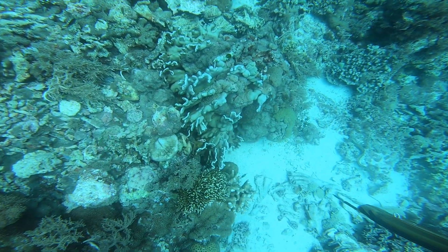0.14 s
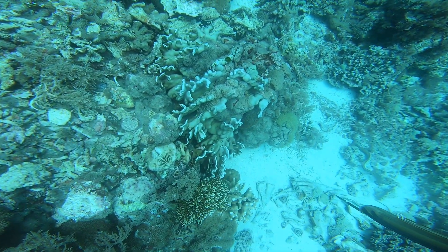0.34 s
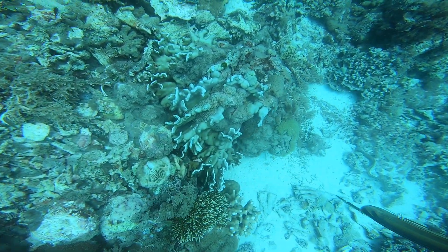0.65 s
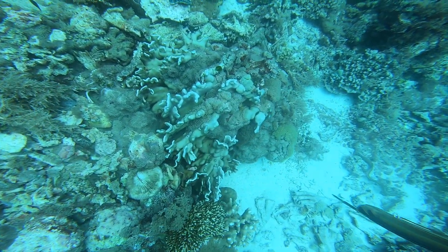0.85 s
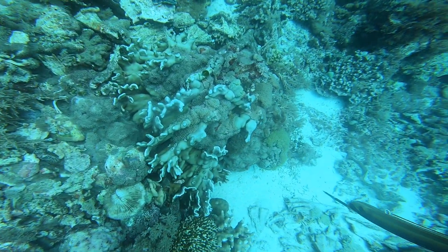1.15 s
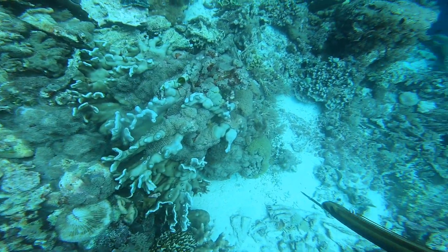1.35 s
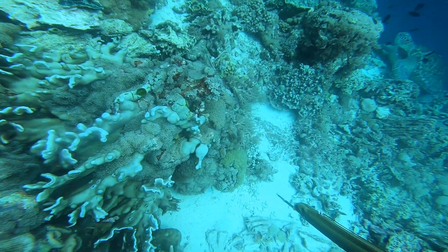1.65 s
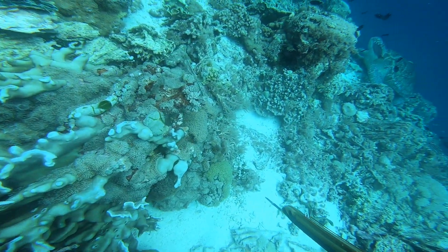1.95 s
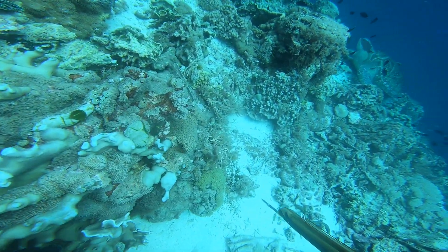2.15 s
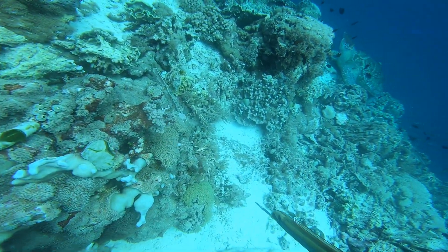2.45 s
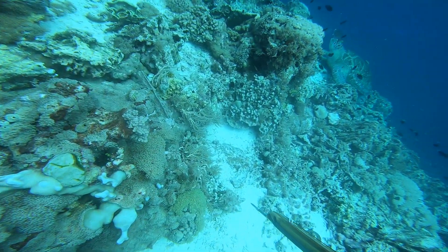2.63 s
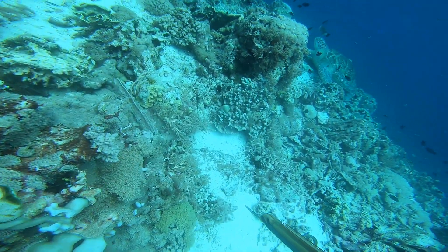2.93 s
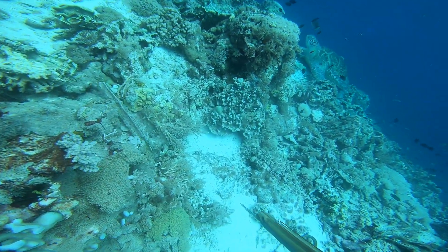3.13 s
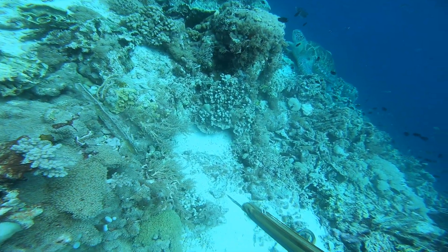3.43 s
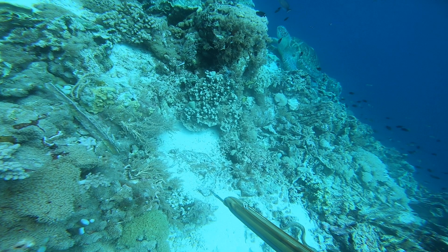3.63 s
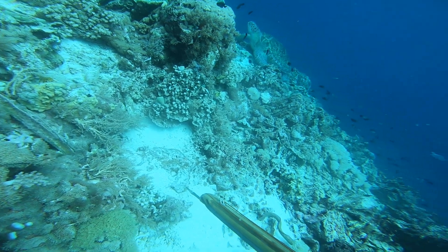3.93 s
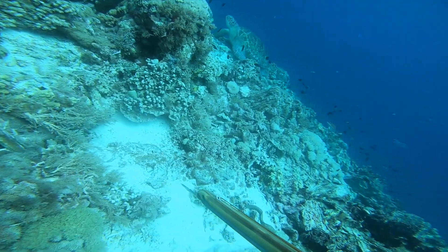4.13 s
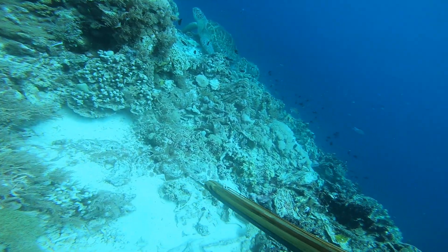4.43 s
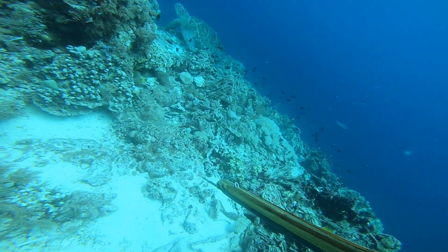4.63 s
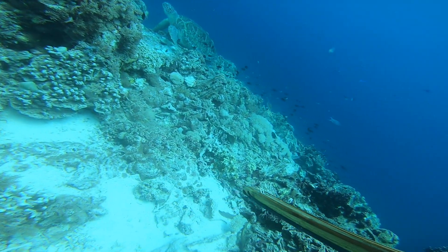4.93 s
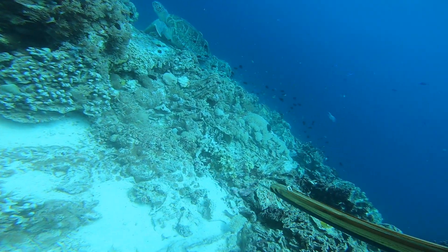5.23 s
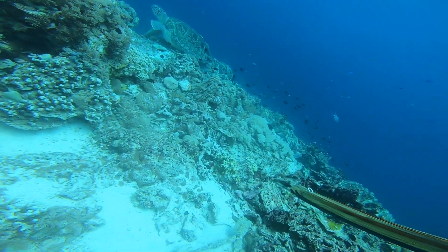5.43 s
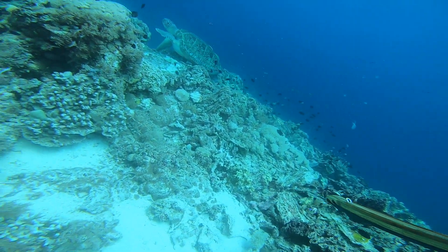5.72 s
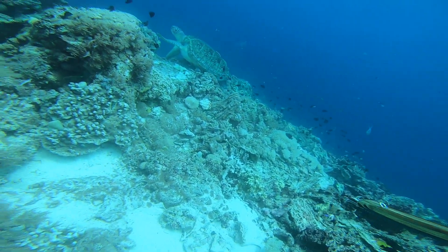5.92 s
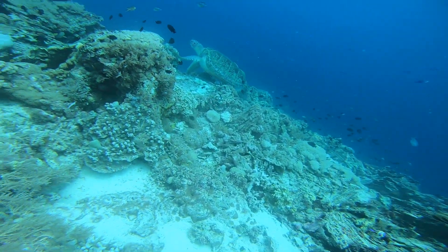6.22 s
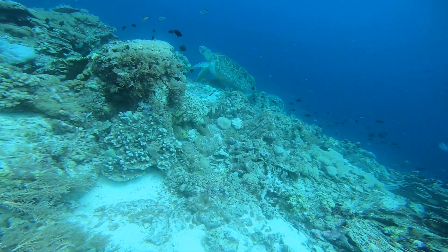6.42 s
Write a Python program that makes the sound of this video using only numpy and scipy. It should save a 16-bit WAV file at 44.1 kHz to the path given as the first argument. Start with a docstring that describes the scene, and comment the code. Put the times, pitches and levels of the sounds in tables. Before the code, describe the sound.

Many small sharp clicks and crackles fill a coral reef underwater, while water rumbles past and occasional low knocks and pops sound.

```python
"""A coral reef, heard from a watertight camera housing that glides over it.
Snapping shrimp crackle all around, each snap an impulse that excites the housing's normal modes.
Among them come dull pops and low knocks, both damped oscillations, and a few bubbles rising in pitch.
Turbulent water rumbles past the housing. The stereo image is a point at first, then opens wide."""
import sys
import numpy as np
from scipy import signal
from scipy.fft import rfft, irfft, next_fast_len
from scipy.io import wavfile

SR = 44100
rng = np.random.default_rng(int(sys.argv[2]) if len(sys.argv) > 2 else 0)


def file_out(sig):
    """Save sig as 16-bit WAV at sys.argv[1]."""
    # one column per channel
    cols = np.atleast_2d(sig).T
    # limit, then scale
    lim = np.clip(cols, -1, 1)
    pcm = np.round(lim * 32767).astype(np.int16)
    wavfile.write(sys.argv[1], SR, pcm)


N = 289737

# All levels are relative.
# loudest snaps of near shrimp: t/s, level/dB, tilt/(dB per octave), presence near 3.7 kHz/dB
NEAR_SNAPS = [(0.0102, -27, -2.5, -2.5), (0.0165, -31, -7, -4), (0.0295, -40, 7.5, -4.5),
              (0.083, -34.5, -9, 7), (0.2024, -31, -5, -3), (0.2136, -32.5, -0.5, 6), (0.329, -38.5, 0, 0),
              (0.3526, -35, -9.5, 12), (0.4989, -25.5, -1.5, -1), (0.1984, -35.5, -10, 6),
              (0.408, -34, -13, -3), (0.587, -49.5, 11.5, -8), (0.6082, -46.5, -10, 23),
              (0.664, -36.5, -3.5, 2), (0.783, -35.5, -3.5, 3), (0.991, -33, 3, 1), (0.9943, -24, -6, -2.5),
              (1.0251, -23, -5.5, -6), (1.0305, -23, -5, -13), (1.0837, -32.5, -5.5, 4),
              (1.2006, -39.5, 10.5, -4), (1.2451, -32, -6, -11), (1.2481, -18.5, -8.5, -4),
              (1.3297, -41.5, -11.5, 23.5), (1.3717, -35, 2.5, -6), (1.5184, -32.5, 5.5, -9.5),
              (1.572, -33, -1.5, -12), (1.7463, -41.5, 2, 2.5), (1.756, -35, -3, -2),
              (1.8656, -35, 1.5, -0.5), (1.8911, -20, -3.5, -17), (1.8953, -18, -6.5, -21),
              (2.087, -33, 6.5, -6.5), (2.1685, -45, 3, 5), (2.296, -45, 1.5, 2), (2.5253, -46, 5, -2),
              (2.6365, -42.5, 1, -2), (2.7402, -35.5, 8.5, -4.5), (3.095, -30, -4.5, -14),
              (3.1044, -52, 5.5, -14), (3.2403, -45, 5.5, -1), (3.3162, -40, -0.5, -10),
              (3.4313, -49, 1, -7), (3.462, -38, -6, 2), (3.5236, -43.5, 0, 3), (3.477, -31, -10, 15),
              (3.4868, -42.5, 5.5, 4), (3.8758, -41.5, -9, 10), (3.9089, -35, -15, -10),
              (4.0614, -39, -15, -17), (4.0667, -41, -9, -14), (4.1188, -43, 5, -7),
              (4.1992, -40.5, 2.5, -0.5), (4.248, -38.5, 0.5, 3), (4.3502, -39, -12, 2.5),
              (4.425, -43, 1, -5), (4.4436, -42.5, 7, -6.5), (4.543, -47.5, 6, 5),
              (4.6608, -43.5, 5.5, 2.5), (4.715, -36, -0.5, -0.5), (4.7839, -46.5, 10.5, -13),
              (4.874, -45, -6, 10), (4.8798, -37, -4, 11.5), (5.011, -38, -3.5, -6),
              (5.0441, -44.5, 2, 2.5), (5.2454, -30.5, -11, 6), (5.2557, -32, -2, 8), (5.4707, -47, 7.5, 2),
              (5.627, -23.5, -3.5, -6.5), (5.6661, -38, -4.5, 3), (5.7947, -40.5, 2, 13.5),
              (5.8065, -42.5, 0.5, 15.5), (5.8633, -41.5, -0.5, 9), (5.8731, -38.5, -0.2, 4.5),
              (6.2435, -52, 9.5, -12), (6.2798, -40, -3, -2), (6.3515, -40, 3, -6),
              (6.4528, -36.5, 1.8, -14), (6.4735, -33.5, -1.5, 12.5), (6.483, -38, -0.5, 2)]
# normal modes of the housing: f/Hz, bandwidth/Hz, level/dB
HOUSING_MODES = [(1310, 65, -9.5), (1782, 258, -5.5), (2200, 261, 3), (2555, 276, -1.5), (3233, 220, -4),
                 (4040, 526, -8.5), (4940, 590, -4), (6210, 630, -12), (7180, 320, -16.5), (8790, 760, -17),
                 (10060, 3200, -27.5)]
# the colony's crackle, which falls as the dense coral is left behind: t/s, level/dB
COLONY_LEVEL = [(0, -50.5), (0.86, -52), (1.25, -49.5), (1.74, -54), (2.05, -54.5), (2.8, -61),
                (3.45, -56.5), (3.8, -60.5), (4.48, -56.5), (4.85, -58.5), (5.6, -57), (6.05, -58.5),
                (6.28, -57.5), (6.57, -57)]
# loudest dull pops, perhaps fish biting at the coral: t/s, level/dB
NEAR_POPS = [(0.2057, -40.5), (0.2693, -40.5), (0.4898, -40), (0.737, -44.5), (0.9343, -36), (0.964, -38),
             (0.992, -35), (1.1745, -40.5), (1.4264, -43), (1.7068, -43.5), (1.755, -36.5), (1.8175, -43.5),
             (2.417, -50.5), (2.6214, -44.5), (3.214, -42), (3.226, -44), (3.241, -39), (3.2566, -41.5),
             (3.4301, -41), (3.5616, -41), (3.6212, -46.5), (3.81, -52), (4.0608, -53), (4.219, -45.5),
             (5.7007, -42.5), (5.8814, -42), (5.983, -42), (6.1747, -43)]
# loudest low knocks, perhaps of the housing's mount: t/s, level/dB, f/Hz, thud re knock/dB
LOUD_KNOCKS = [(0.2157, -47.5, 362, -3), (0.3008, -45, 325, -12), (0.4582, -36.5, 390, -4.5),
               (1.1321, -33.5, 396, -13), (1.7622, -27.5, 371, -15), (2.2346, -42, 394, -1.5),
               (2.5165, -43, 358, 2.5), (2.8192, -46, 367, -7), (2.8758, -38, 415, -13.1),
               (3.1768, -45, 440, 1.5), (3.8756, -49, 412, 3), (4.0978, -48, 360, 3),
               (4.1713, -47.5, 430, -1), (4.3458, -47.5, 489, 2), (4.4075, -40.5, 386, -8),
               (4.4848, -40.5, 416, -19), (4.6932, -43.5, 397, -21), (4.783, -38, 402, -25),
               (5.4811, -39, 423, -2), (5.5357, -41.5, 424, 5), (5.5935, -41.5, 465, 3),
               (5.669, -43, 450, -21), (5.7139, -42, 437, 1), (6.118, -47.5, 434, -1)]
# bubbles: t/s, level/dB, starting f/Hz, rise/octaves, duration/s
BUBBLE_NOTES = [(1.743, -37, 167, 0.86, 0.03), (1.755, -43.5, 610, 0.09, 0.021),
                (1.772, -43.5, 400, 0.11, 0.019), (2.539, -54.5, 597, .1, 0.017),
                (3.567, -44.5, 2096, 0.045, 0.029), (4.071, -54, 680, .1, 0.013)]
# surges of water: crest t/s, swell/dB, duration/s
WATER_SURGES = [(0.483, 3.5, 0.15), (0.8, 5.5, 0.076), (1.422, 6, 0.15), (2.33, 7.5, 0.049),
                (2.53, 12, .16), (2.693, 17, 0.035), (2.893, 3.5, .1), (3.224, 8, 0.083), (3.623, 7, 0.053),
                (3.885, 6.5, 0.054), (4.045, 5, 0.085), (5.12, 6, 0.073), (5.3, 7.5, 0.25), (5.55, 7.5, .2),
                (6.065, 8.5, 0.15)]
# spectral density of the flow's rumble: f/Hz, level/dB
RUMBLE_SPECTRUM = [(12, -4.5), (25, 0.5), (42, -4), (65, -10), (100, -18.5), (160, -33), (300, -83)]
# spectral density of the flow's wash: f/Hz, level/dB
WASH_SPECTRUM = [(60, -27), (110, -5), (155, 3.5), (220, -4.5), (295, -10), (390, -4.5), (480, -8.5),
                 (650, -19.5), (1000, -20.5), (1600, -20), (3000, -62)]
# stereo width: t/s, width (0 to 1)
STEREO_WIDTH = [(1.8, 0), (1.92, 0.22), (2.4, 0.68), (4.2, 0.83), (4.4, 0.3), (4.65, 0.15), (5.1, 0.62)]
# side channel re mid at full width: f/Hz, level/dB
SIDE_LEVEL = [(60, -2), (170, -4), (280, -14), (420, 7), (800, 13.5), (1300, 10.5), (2200, 5.5), (3200, 1),
              (4200, -0.5), (5200, 2), (9000, 1.5), (15000, 3.5)]
# phase lead of side over mid: f/Hz, phase/rad
SIDE_LEAD = [(90, 0), (170, 1.7), (280, 3.0), (420, 2.8), (800, 1.8), (1300, 1.65), (3200, 1.65),
             (4200, 1.9), (5200, 3.1)]


def near_shrimp(gain_db, tilt_db, presence_db):
    """Impulse excitation: a claw snap, or its echo off the surface, strikes the housing as one click."""
    times, levels, tilts, presences = np.transpose(NEAR_SNAPS)
    return housing(times, levels + gain_db, tilts + tilt_db, presences + presence_db, scatter_db=3.5)


def housing(times, level_db, tilt_db, presence_db, scatter_db):
    """Modal superposition: each click drives every resonance with its own colour and a random weight."""
    onsets = np.clip(np.round(times * SR).astype(int), 0, N - 1)
    chance_db = scatter_db * rng.standard_normal((len(onsets), len(HOUSING_MODES)))
    out = np.zeros(N)
    for k, (hz, bandwidth, mode_db) in enumerate(HOUSING_MODES):
        presence_band = np.exp(-(np.log2(hz / 3750) / 0.55) ** 2)
        colour_db = tilt_db * np.log2(max(hz, 1800) / 2200) + presence_db * presence_band
        clicks = np.bincount(onsets, from_db(level_db + mode_db + colour_db + chance_db[:, k]), N)
        radius = np.exp(-np.pi * bandwidth / SR)
        feedforward = np.array([1, 0, -1]) * (1 - radius ** 2) / 2
        feedback = [1, -2 * radius * np.cos(2 * np.pi * hz / SR), radius ** 2]
        out += (-1) ** k * signal.lfilter(feedforward, feedback, clicks + 1e-18)
    return wall(out)


def wall(x):
    """Multipath transmission: the wall passes one band, by paths a fraction of a millisecond apart."""
    x = signal.sosfilt(signal.butter(2, [1150, 11000], "band", fs=SR, output="sos"), x)
    for delay_s in (0.00011, 0.00027):
        feedback = np.r_[1, np.zeros(int(delay_s * SR)), -0.5]
        x = signal.lfilter(feedback[::-1], feedback, x + 1e-18)   # allpass
    return x


def colony(ticks_db, fizz_db, strays_db, treble_db):
    """Incoherent summation: ticks and stray snaps over a distant fizz, whose top swings less in level."""
    ticks = from_db(ticks_db) * far_shrimp(per_s=260, spread_db=7.0, tilt_db=1.0, tilt_spread_db=6.0)
    fizz = from_db(fizz_db) * far_shrimp(per_s=2500, spread_db=-1.0, tilt_db=0.6, tilt_spread_db=9.5)
    strays = from_db(strays_db) * far_shrimp(per_s=18, spread_db=-0.9, tilt_db=2.5, tilt_spread_db=10.0)
    level_db = in_time(COLONY_LEVEL)
    crackle = from_db(level_db) * (ticks + fizz)
    # the top, above 7 kHz, carries farther and follows only a share of the swing
    top = shaped(crackle, lambda hz: 1 / (1 + (7000 / (hz + 1)) ** 8))
    top_db = -65.5 + treble_db + 0.68 * (level_db - level_db.mean())
    return strays + crackle + top * (from_db(top_db - level_db) - 1)


def far_shrimp(per_s, spread_db, tilt_db, tilt_spread_db):
    """Shot noise: snaps from random times and distances ring the housing; rms one."""
    when, reach, brightness, presence = rng.random((int(per_s * N / SR), 4)).T
    tilts = tilt_db + tilt_spread_db * (2 * brightness - 1)
    distance_db = spread_db * np.minimum(-np.log(1 - reach), 2.6)   # capped exponential distribution
    level_db = distance_db - 0.6 * tilts   # the tilt pivots in mid-treble, so bright snaps are no louder
    return rms_one(housing(when * N / SR, level_db, tilts, 8.3 * (2 * presence - 1), scatter_db=4.5))


def pops(nominal_hz, low_db, t60, lag_s, grit_db):
    """Heavy damping: a pop is a few gritty cycles of three broad resonances, the lower ones later."""
    near = [(s, level_db, nominal_hz) for s, level_db in NEAR_POPS]
    faint = random_events(per_s=20, ranges=[(-68, -68 + 12.5), (1220, 1620)])   # level/dB, nominal f/Hz
    events = np.vstack([near, faint])
    detune = 2 ** rng.uniform(-0.16, 0.31, (len(events), 3))
    out = np.zeros(N)
    for (s, level_db, hz), (high, middle, low) in zip(events, detune):
        add(out, s - lag_s, from_db(level_db) * ping(hz * high * 1.118, t60, rise_s=0.00088))
        add(out, s, from_db(level_db + low_db) * ping(hz * middle * 0.78, t60, rise_s=0.00092))
        add(out, s + lag_s, from_db(level_db + low_db - 18) * ping(hz * low * 0.527, t60, rise_s=0.0054))
    return out * (1 + from_db(grit_db) * drift(680))


def knocks(gain_db, thud_gain_db, overtone_db, t60, grit_db):
    """Free vibration: a soft contact rings one low mode and a weak overtone above a duller thud."""
    # level/dB, f/Hz, thud re knock/dB
    faint = random_events(per_s=3, ranges=[(-62, -62 + 9.5), (344, 480), (-8.5, -8.5 + 9.5)])
    out = np.zeros(N)
    for s, level_db, hz, thud_db in np.vstack([LOUD_KNOCKS, faint]):
        mode = ping(hz, t60, rise_s=0.0048)
        overtone = from_db(overtone_db) * ping(hz * 1.9, t60, rise_s=0.0032)
        thud = from_db(thud_db + thud_gain_db) * ping(hz=147, t60=0.057, rise_s=0.0069)
        add(out, s, from_db(level_db + gain_db) * (mode + overtone + thud))
    return out * (1 + from_db(grit_db) * drift(160))


def bubbles():
    """Bubble resonance: each swells and fades on one clear note that slides upward."""
    out = np.zeros(N)
    for s, level_db, hz, octaves, duration in BUBBLE_NOTES:
        age = np.linspace(0, 1, int(duration * SR))
        phase = 2 * np.pi * np.cumsum(hz * 2 ** (octaves * age)) / SR
        add(out, s, from_db(level_db) * np.sin(np.pi * age) ** 2 * np.sin(phase))
    return out


def flow(rumble_gain_db, wash_gain_db):
    """Turbulent pressure: eddies make a deep rumble and a hollow wash, lifted by bell-shaped surges."""
    t = np.arange(N) / SR
    swell_db = sum(db * np.exp(-(2 * (t - s) / duration) ** 2) for s, db, duration in WATER_SURGES)
    rumble_db = -53 + rumble_gain_db + swell_db
    wash_db = -61.5 + wash_gain_db + 0.13 * swell_db
    rumble = from_db(rumble_db) * turbulence(RUMBLE_SPECTRUM, depth_db=1.5, rate_hz=12.4)
    wash = from_db(wash_db) * turbulence(WASH_SPECTRUM, depth_db=3.0, rate_hz=18.5)
    return rumble + wash


def turbulence(spectrum, depth_db, rate_hz):
    """Random amplitude modulation: coloured noise comes in lumps; rms one."""
    noise = shaped(rng.standard_normal(N), lambda hz: from_db(at_hz(spectrum, hz)))
    return rms_one(noise * from_db(depth_db * drift(rate_hz)))


def reef_scatter(x, wet_db, t60):
    """Diffuse reflection: rough coral adds a short tail to the direct sound."""
    t = np.arange(SR // 10) / SR
    tail = rng.standard_normal(len(t)) * from_db(-60 * t / t60) * (t > 0.001)
    return x + from_db(wet_db) * signal.fftconvolve(x, tail / np.linalg.norm(tail))[:N]


def ping(hz, t60, rise_s):
    """Damped oscillation: a sine under an envelope that rises to one and decays exponentially."""
    t = np.arange(SR // 20) / SR
    envelope = (1 - np.exp(-(t / rise_s) ** 2)) * from_db(-60 * t / t60)
    return envelope / envelope.max() * np.sin(2 * np.pi * hz * t)


def random_events(per_s, ranges):
    """Uniform distribution: each row is a random time, then one value from each (low, high) range."""
    low, high = np.transpose([(0, N / SR), *ranges])
    return rng.uniform(low, high, (int(per_s * N / SR), len(low)))


def drift(rate_hz):
    """Random fluctuation: white noise through a two-pole low-pass; rms one."""
    pole = np.exp(-2 * np.pi * rate_hz / SR)
    noise = rng.standard_normal(N + SR // 2)
    return rms_one(signal.lfilter([1], [1, -2 * pole, pole ** 2], noise)[-N:])


def shaped(x, response):
    """Linear filtering: the spectrum of x is multiplied by a response, a function of f/Hz."""
    size = next_fast_len(N + SR // 2)
    hz = np.arange(size // 2 + 1) * SR / size
    return irfft(rfft(x, size) * response(hz), size)[:N]


def at_hz(table, hz):
    """Interpolation on a log-frequency axis."""
    frequencies, values = np.transpose(table)
    return np.interp(np.log(hz + 1e-3), np.log(frequencies), values)


def in_time(table):
    """Linear interpolation in time, one value a sample."""
    return np.interp(np.arange(N) / SR, *np.transpose(table))


def add(out, s, sound):
    """Superposition: a sound joins the mix at time s."""
    start = int(np.clip(round(s * SR), 0, N - 1))
    out[start:start + len(sound)] += sound[:N - start]


def from_db(db):
    """Amplitude ratio of a level in decibels."""
    return 10 ** (np.asarray(db) / 20)


def rms_one(x):
    """Normalisation to an rms of one."""
    return x / np.sqrt(np.mean(x ** 2) + 1e-20)


def scene():
    """Mid-side stereo: all sources meet in the mid; the side is a filtered copy plus its own eddies."""
    snaps = near_shrimp(gain_db=30.5, tilt_db=1.0, presence_db=3.0)
    crackle = colony(ticks_db=-2.26, fizz_db=-5.0, strays_db=-63, treble_db=14.0)
    dull_pops = pops(nominal_hz=1600, low_db=-2.0, t60=0.01, lag_s=0.00067, grit_db=-23)
    mid = reef_scatter(snaps + crackle, wet_db=-9.5, t60=0.041)
    mid += reef_scatter(dull_pops, wet_db=-0.5, t60=0.05)
    mid += knocks(gain_db=-0.15, thud_gain_db=-1.3, overtone_db=-20, t60=0.023, grit_db=-16.5)
    mid += bubbles()
    mid += flow(rumble_gain_db=2.17, wash_gain_db=1.0)
    side = shaped(mid, lambda hz: from_db(at_hz(SIDE_LEVEL, hz)) * np.exp(1j * at_hz(SIDE_LEAD, hz)))
    side += flow(rumble_gain_db=3.0, wash_gain_db=6.0)
    side *= in_time(STEREO_WIDTH)
    return np.array([mid + side, mid - side])


def record(dry):
    """Band limiting: a steep elliptic low-pass cuts the treble above 16 kHz."""
    return signal.sosfilt(signal.ellip(10, 0.2, 80, 16000, fs=SR, output="sos"), dry)


dry = scene()
out = record(dry)
file_out(out)
```